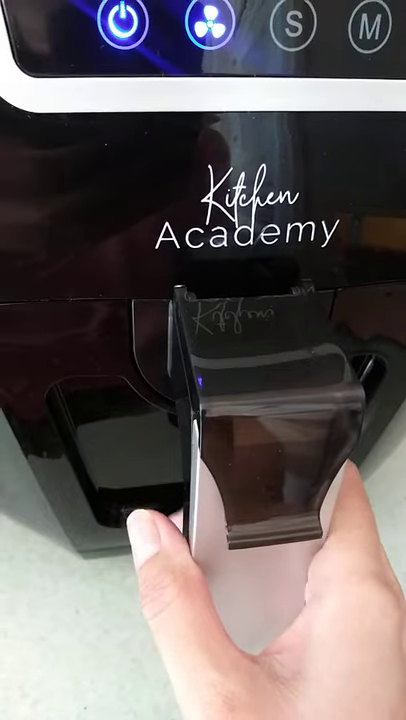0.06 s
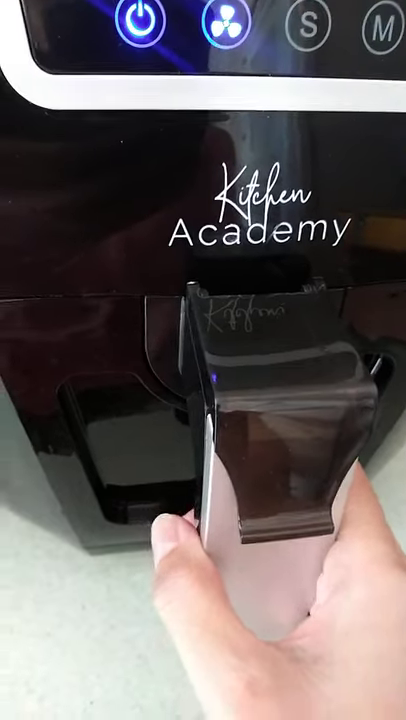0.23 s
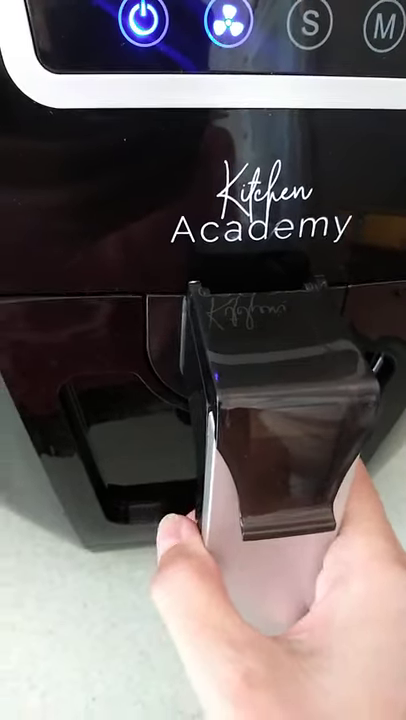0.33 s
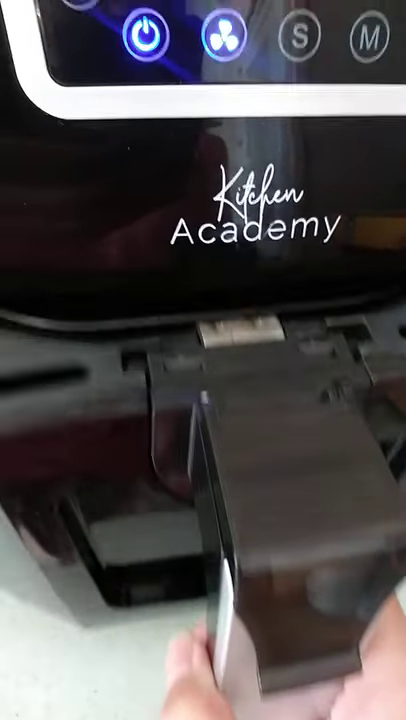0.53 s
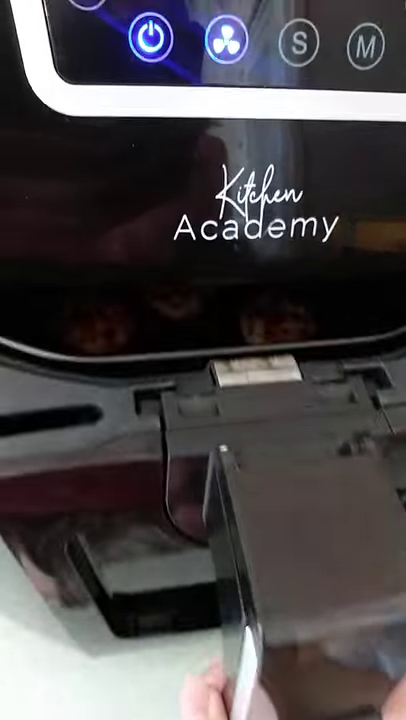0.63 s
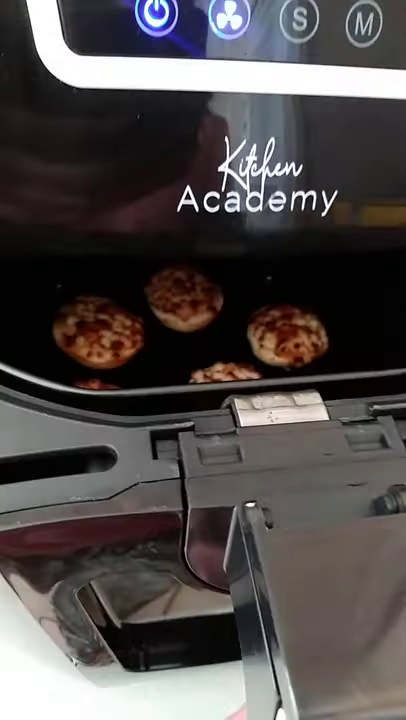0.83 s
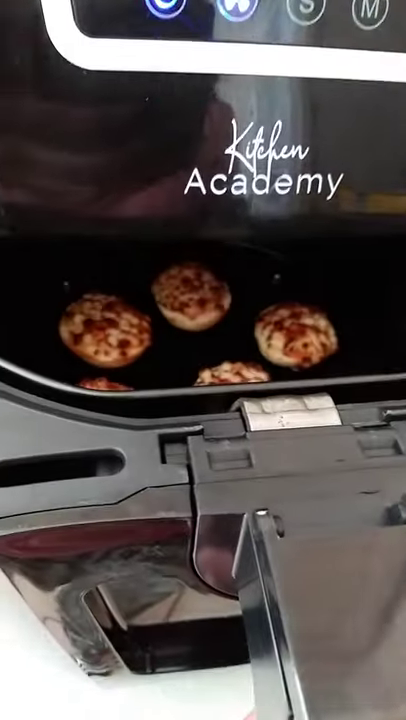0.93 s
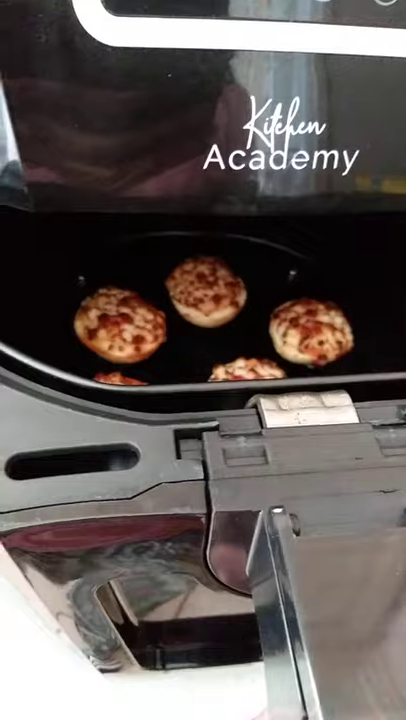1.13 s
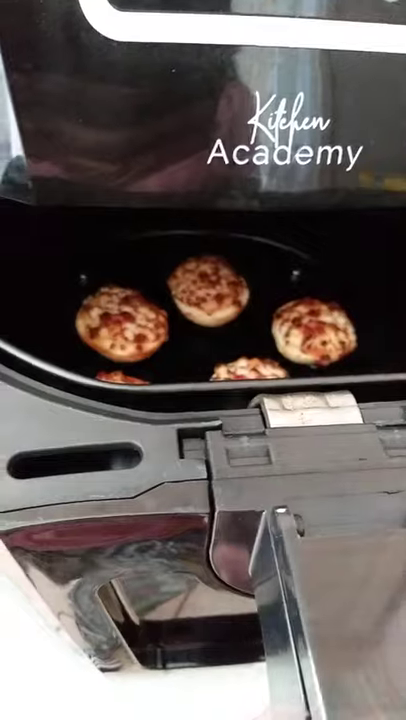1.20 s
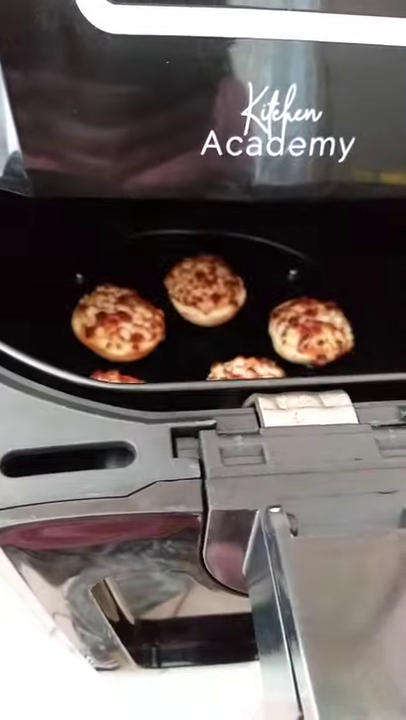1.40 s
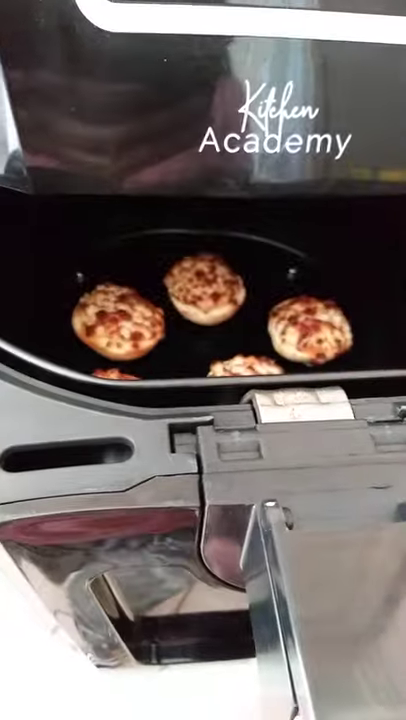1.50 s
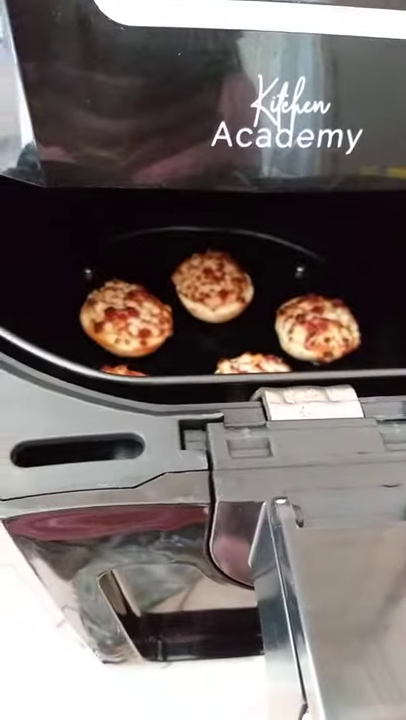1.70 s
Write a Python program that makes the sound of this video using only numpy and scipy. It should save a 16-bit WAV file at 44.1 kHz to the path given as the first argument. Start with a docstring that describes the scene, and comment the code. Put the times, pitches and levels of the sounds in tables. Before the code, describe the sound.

An air fryer drawer clicks, scrapes and clacks open over a faint fan hum.

```python
"""Opening an air fryer

The basket is pulled open close by: the handle clicks and a steel catch snaps free.
The basket rasps and bumps along its plastic rails and clacks over a stop, booming in the hollow housing.
The rasp fades as the basket slows; the fan whooshes and hums faintly in a small kitchen."""
import sys
import numpy as np
from scipy import signal
from scipy.fft import rfft, irfft, next_fast_len
from scipy.io import wavfile
from scipy.ndimage import map_coordinates

SR = 44100
rng = np.random.default_rng(int(sys.argv[2]) if len(sys.argv) > 2 else 0)


def output_pcm(signal):
    """Save a mono or channel-first signal as 16-bit PCM at the path in sys.argv[1].

    Samples are clipped to [-1, 1] before scaling.
    """
    pcm = np.clip(np.atleast_2d(signal).T, -1, 1) * 32767
    wavfile.write(sys.argv[1], SR, np.round(pcm).astype(np.int16))


N = 77175
TIME = np.arange(N) / SR
HIT_TIME = np.arange(0, 0.5, 1 / SR)  # the seconds after one hit
TOP_HZ = 15900


def amp(db):
    """Turn decibels into a gain to multiply by."""
    return 10 ** (np.asarray(db) / 20)


def unit(x):
    """Scale a sound to an average (rms) level of 1."""
    return x / np.sqrt(np.mean(x ** 2) + 1e-20)


def along(points, hz):
    """Read a table between its rows, on a log pitch scale."""
    pitches, values = np.transpose(points)
    return np.interp(np.log(hz + 1), np.log(pitches + 1), values)


def wobble(turns_per_s):
    """A smooth random curve."""
    points = rng.standard_normal(int(N * turns_per_s / SR) + 4)
    return map_coordinates(points, [TIME * turns_per_s])


def filtered(x, response):
    """Turn each frequency up or down by response(hz)."""
    size = next_fast_len(N + SR // 2)
    return irfft(rfft(x, size) * response(np.fft.rfftfreq(size, 1 / SR)), size)[:N]


def noise(response):
    """Steady noise with a chosen tone colour."""
    return unit(filtered(rng.standard_normal(N), response))


def dull(hz, edge_hz):
    """A soft contact loses the treble above edge_hz."""
    return 1 / np.sqrt(1 + (hz / edge_hz) ** 4)


def peak(f, hz, width_hz):
    """A resonance favours the frequencies near hz."""
    return 1 / (1 + ((f - hz) / (width_hz / 2)) ** 2)


def burst(response, t, fade_s):
    """Noise after a hit. Here and below, fade_s is the time to drop 60 dB."""
    spectrum = rfft(rng.standard_normal(len(t))) * response(np.fft.rfftfreq(len(t), 1 / SR))
    return unit(irfft(spectrum, len(t))) * amp(-60 * t / fade_s)


def ring(tones, t, edge_hz, swell_cycles):
    """A struck object's tones build up over their first cycles, then die away."""
    out = 0
    for hz, db, fade_s in tones:
        level = amp(db + 0.8 * rng.standard_normal() - 60 * t / fade_s) * dull(hz, edge_hz)
        swell = 1 - np.exp(-hz * t / swell_cycles)
        out += level * swell * np.sin(2 * np.pi * hz * t)
    return out


def add(track, start_s, sound):
    """Mix a sound into a track."""
    start = round(start_s * SR)
    track[start:start + len(sound)] += sound[:N - start]


# How long the kitchen echoes: pitch_hz, fade_s
ROOM_FADES = [(100, 0.22), (500, 0.19), (2500, 0.26), (8000, 0.2), (15000, 0.18)]


def kitchen(x):
    """The room's echo, each frequency dying at its own speed."""
    hz, t, spectrum = signal.stft(rng.standard_normal(SR // 2), SR, nperseg=256)
    fade = amp(-60 * t / along(ROOM_FADES, hz)[:, None])
    swell = 1 - np.exp(-t / 0.016)
    tail = signal.istft(spectrum * fade * swell, SR, nperseg=256)[1]
    return signal.fftconvolve(x, tail / np.linalg.norm(tail))[:N]


def with_echoes(x, echo_db=-15, spread_s=0.014, count=8):
    """A sound plus its quick echoes off the worktop, wall and cupboards."""
    out = x.copy()
    for delay, size in rng.random((count, 2)):
        add(out, 0.001 + spread_s * delay, amp(echo_db) * (0.5 + size) * x)
    return out


# Tone colour of the rushing air: pitch_hz, level_db
AIR_COLOUR = [(20, -42), (35, -14.5), (58, -2.5), (110, -11.5), (250, -8.5), (600, -12), (1000, -18.5),
              (1300, -21.5), (2500, -28.5), (4500, -31.5), (8500, -31), (10500, -41), (15500, -35)]
# The fan's shaft and blade tones: pitch_hz, level_db
FAN_TONES = [(58, -68.5), (237, -67), (355, -76.5), (587, -79.5), (1184, -78.5)]


def fan(air_db=-63, sink_from_s=1.36, sink_db_per_s=3.5, drift_hz=0.64, shut_db=-1.5, open_s=0.61):
    """Rushing air and a wavering hum, a little louder once the basket is open."""
    air_level = amp(air_db - sink_db_per_s * np.maximum(TIME - sink_from_s, 0))
    air = air_level * noise(lambda f: amp(along(AIR_COLOUR, f)))
    hum = np.zeros(N)
    for hz, db in FAN_TONES:
        level = amp(db + 1.5 * wobble(15))
        phase = 2 * np.pi * np.cumsum(hz + drift_hz * wobble(11)) / SR
        hum += level * np.sqrt(2) * np.sin(phase)
    return (air + hum) * amp(shut_db * np.clip(1 - TIME / open_s, 0, 1))


def grip(start_s=0.11, level_db=-49, fade_db_per_s=110, rise_s=0.00067):
    """The hand scuffs softly as it tightens on the plastic handle."""
    out = np.zeros(N)
    rub = noise(lambda f: peak(f, hz=1376, width_hz=900))
    swell = 1 - np.exp(-TIME / rise_s)
    add(out, start_s, rub * amp(level_db - fade_db_per_s * TIME) * swell)
    return out


def chamber(start_s=0.61, pitch_hz=250, width_hz=28, level_db=-44, fade_db_per_s=68):
    """Once open, the cooking chamber gives the slowing slide a hollow note."""
    out = np.zeros(N)
    note = noise(lambda f: peak(f, pitch_hz, width_hz))
    swell = 1 - np.exp(-np.pi * width_hz * TIME)
    add(out, start_s, note * amp(level_db - fade_db_per_s * TIME) * swell)
    return out


# Jerks of the basket: start_s, level_db
JERKS = [(0.123, -42.5), (0.299, -32), (0.447, -25), (0.543, -38)]


def air_shoves(pitch_hz=83.4, rise_s=0.013):
    """Each jerk pushes the air in the housing: a soft, low pulse."""
    out = np.zeros(N)
    swell = (TIME / rise_s * np.exp(1 - TIME / rise_s)) ** 2
    for start_s, db in JERKS:
        add(out, start_s, amp(db) * swell * np.sin(2 * np.pi * pitch_hz * TIME))
    return out


# The groan as the basket drags up to its stop: time_s, pitch_hz, level_db
GROAN_PATH = [(.284, 202, -61), (.3, 199.8, -35), (.345, 197.3, -39), (.378, 200, -51),
              (.418, 213.3, -26.5), (.438, 195, -28.5), (.455, 188, -48)]


def groan(wander_hz=4, rough_db=0.5, rail_s=0.31, rail_hz=446, rail_db=-31, rail_fade_s=0.23):
    """Sticking and slipping makes the housing groan; the rail rings as the basket breaks loose."""
    times, hz, db = np.transpose(GROAN_PATH)
    level_db = np.interp(TIME, times, db, left=-np.inf, right=-np.inf)
    pitch_hz = np.interp(TIME, times, hz) + wander_hz * wobble(40)
    phase = 2 * np.pi * np.cumsum(pitch_hz) / SR
    out = amp(level_db + rough_db * wobble(90)) * np.sqrt(2) * np.sin(phase)
    add(out, rail_s, ring([(rail_hz, rail_db, rail_fade_s)], TIME, TOP_HZ, swell_cycles=1.4))
    return out


def slips(colour, slips_per_s=9000, spread_db=2):
    """Thousands of tiny slips blur into a rubbing sound."""
    pulses = (rng.random(N) < slips_per_s / SR) * rng.standard_normal(N)
    pulses *= amp(spread_db * rng.standard_normal(N))
    return unit(filtered(pulses, lambda f: amp(along(colour, f))))


# Tone colours of rubbed plastic, steel and the rumbling basket: pitch_hz, level_db
RASP_COLOUR = [(450, -29), (900, -6), (1300, -4), (2100, 1.5), (3000, -1), (3800, -5.5), (5500, -14.5),
               (9000, -29), (12000, -46)]
STEEL_COLOUR = [(2500, -29), (4500, -6.5), (6000, -5), (7200, 0.5), (8050, 1), (8400, 6), (8800, -3),
                (10000, -15), (11500, -25), (15500, -28.5)]
RUMBLE_COLOUR = [(25, -9), (80, 0), (135, -2), (240, -3), (330, -4.5), (480, 1), (800, -9.5), (1300, -24),
                 (3000, -58)]
# How loud the slide is along the way: time_s, rasp_db, hiss_db, rumble_db
SLIDE_LEVELS = [(0, -80, -82, -80), (.07, -70, -73, -53), (.11, -63, -72, -43.5),
                (0.166, -65.5, -71.5, -49.5), (0.209, -47.5, -53, -43), (0.289, -42, -44.5, -39),
                (.39, -45.5, -42, -38), (.425, -50, -48, -33.5), (.5, -46, -49, -44.5),
                (.58, -53.5, -48.5, -45), (.67, -55.5, -50, -52.5), (0.789, -58.5, -56.5, -55.5),
                (.88, -63.5, -65, -66), (1.1, -66, -69, -65.5), (1.27, -75.5, -79.5, -68),
                (1.75, -81, -81, -90)]


def slide(grab_db=-0.15, judder_db=1):
    """Plastic rasps and steel hisses on the rails while the basket judders."""
    times, *levels = np.transpose(SLIDE_LEVELS)
    rasp_db, hiss_db, rumble_db = [np.interp(TIME, times, level) for level in levels]
    grab = amp(grab_db * wobble(50))
    rasp = amp(rasp_db) * slips(RASP_COLOUR)
    hiss = amp(hiss_db) * slips(STEEL_COLOUR)
    rumble = amp(rumble_db + judder_db * wobble(60)) * noise(lambda f: amp(along(RUMBLE_COLOUR, f)))
    return grab * (rasp + hiss) + rumble


# Tone colour of a thud: pitch_hz, level_db
THUD_COLOUR = [(30, -35.5), (150, -4.5), (255, 5.5), (330, -3), (550, -0.5), (900, -10.5), (1500, -27.5),
               (4000, -58)]
# Tones of the hollow housing: pitch_hz, level_db, fade_s
HOUSING_TONES = [(190.94, 0, 0.28), (324.6, -9.5, 0.24), (406, -13, 0.2), (453.5, -14.5, 0.27),
                 (545.6, 0, 0.14), (690, -9, 0.085), (929, -14.5, 0.15), (1174, -19.5, 0.31)]
# The basket hits the housing: start_s, boom_db, thud_db, dull_above_hz, thud_fade_s
BUMPS = [(0.0513, -69, -49, 1590, 0.022), (0.071, -50.5, -33, 2500, 0.039),
         (0.0976, -46.5, -25.5, 1000, 0.025), (0.1112, -31, -31, 390, 0.086),
         (.237, -43.5, -33, 890, 0.051), (.291, -49.5, -30, 600, 0.062), (.369, -30, -28, 840, 0.15),
         (0.444, -15, -26.5, 990, 0.15), (.537, -37.5, -23.5, 990, 0.059), (0.6485, -52, -34.5, 434, 0.076)]


def bumps(rise_s=0.001):
    """Each bump is a short, dull thud that sets the housing booming."""
    out, t = np.zeros(N), HIT_TIME
    for start_s, boom_db, thud_db, edge_hz, fade_s in BUMPS:
        thud = burst(lambda f: amp(along(THUD_COLOUR, f)) * dull(f, edge_hz), t, fade_s)
        thud *= 1 - np.exp(-t / rise_s)
        boom = ring(HOUSING_TONES, t, edge_hz, swell_cycles=1.2)
        add(out, start_s, amp(thud_db) * thud + amp(boom_db) * boom)
    return out


# Tone colour of struck plastic: pitch_hz, level_db
CLACK_COLOUR = [(30, -37.5), (150, -21), (500, 3), (1000, -6.5), (1700, 2), (3000, 1), (3900, -5.5),
                (6000, -5), (8800, -2.5), (10500, -22), (15500, -36.5)]
# Tones of the plastic shell and the steel catch: pitch_hz, level_db, fade_s
SHELL_TONES = [(924, -5, 0.27), (1280, 3, 0.1), (1460, -3, 0.13), (1627, -4.5, 0.24), (1725, 1, 0.12),
               (2070, 0, 0.15), (2330, -2, .14), (2774, -1, .11), (3110, -9, 0.21)]
CATCH_TONES = [(7040, -1.5, 0.05), (7430, -0.5, .052), (8455, 2, 0.028), (8640, -2.5, 0.032)]
# Hard contacts: start_s, plastic_db, steel_db, clack_fade_s, dull_above_hz, rise_s
CONTACTS = [(0.073, -38, -59.5, 0.041, 5410, 0.00011), (.2245, -23, -18.5, 0.095, 9000, 0.00053),
            (.2279, -22.5, -27, 0.031, 3500, 0.00029), (.238, -20, -34, 0.07, 2600, 0.001),
            (.2405, -17, -43, 0.036, 2100, .0015), (0.437, -23, -33, 0.096, 6500, 0.00033),
            (0.4455, -25.5, -35, 0.11, 8000, 0.00073)]


def clicks(shell_db=-18, tick_db=-18, tick_fade_s=0.019, zing_db=-5, zing_fade_s=0.07):
    """At each contact the plastic clacks and rings, and the steel catch ticks and zings."""
    out, t = np.zeros(N), HIT_TIME
    for start_s, plastic_db, steel_db, fade_s, edge_hz, rise_s in CONTACTS:
        clack = burst(lambda f: amp(along(CLACK_COLOUR, f)) * dull(f, edge_hz), t, fade_s)
        shell = amp(shell_db) * ring(SHELL_TONES, t, edge_hz, swell_cycles=1)
        catch = ring(CATCH_TONES, t, TOP_HZ, swell_cycles=2)
        zing = amp(zing_db) * burst(lambda f: amp(along(STEEL_COLOUR, f)), t, zing_fade_s)
        tick = rng.standard_normal(len(t)) * amp(tick_db - 60 * t / tick_fade_s)
        click = amp(plastic_db) * (clack + shell) + amp(steel_db) * (catch + zing + tick)
        add(out, start_s, click * (1 - np.exp(-t / rise_s)))
    return out


def scene(click_room_db=-12.5, bump_room_db=-18):
    """Mix the basket, the room and the fan."""
    hard, soft = clicks(), bumps()
    room = kitchen(amp(click_room_db) * hard + amp(bump_room_db) * soft)
    pull = air_shoves() + grip() + with_echoes(slide()) + groan() + chamber()
    return (hard + soft + room + pull + fan())[None]


def record(dry):
    """Thin the deepest bass and cut everything above TOP_HZ."""
    bass_cut = signal.butter(2, 35, "highpass", fs=SR, output="sos")
    thinned = signal.sosfilt(bass_cut, dry[0])
    return filtered(thinned, lambda hz: hz < TOP_HZ)[None]


dry = scene()
out = record(dry)
output_pcm(out)
```